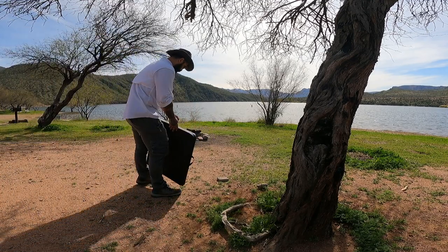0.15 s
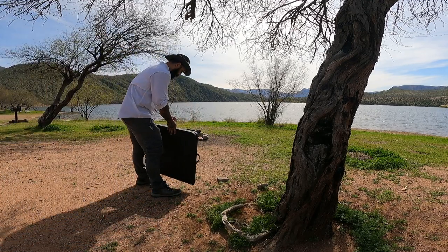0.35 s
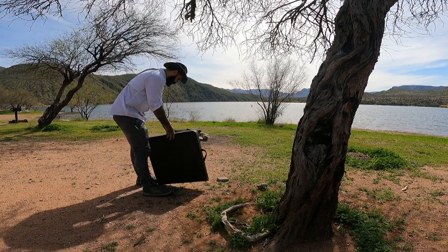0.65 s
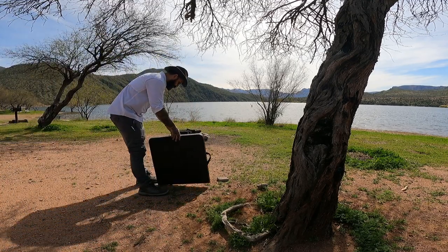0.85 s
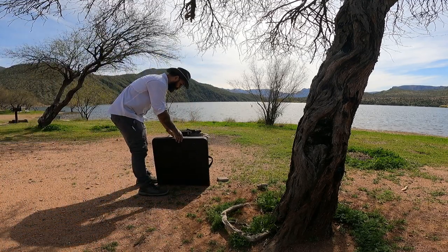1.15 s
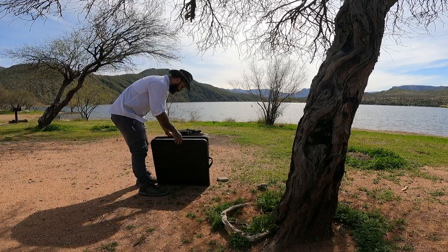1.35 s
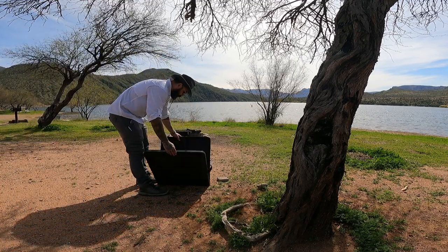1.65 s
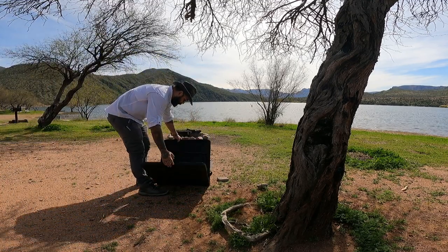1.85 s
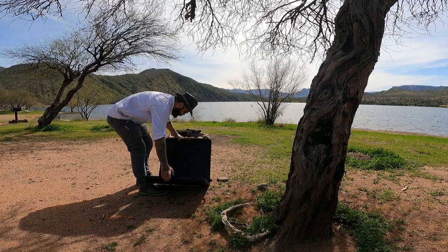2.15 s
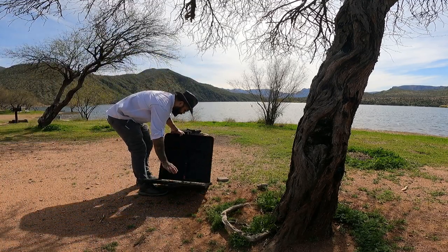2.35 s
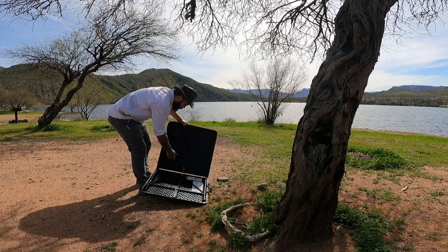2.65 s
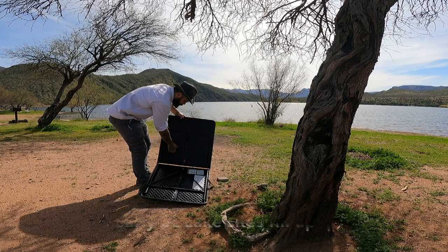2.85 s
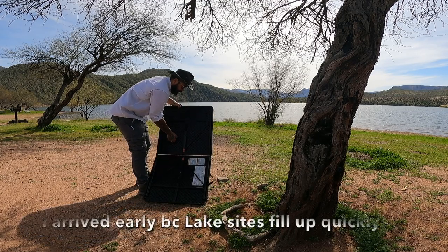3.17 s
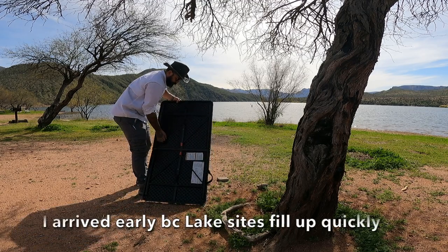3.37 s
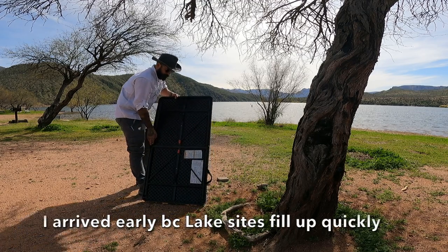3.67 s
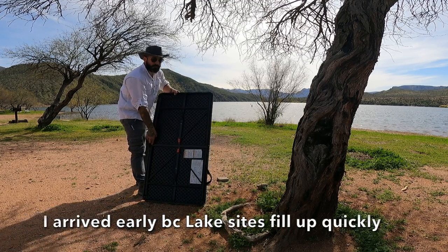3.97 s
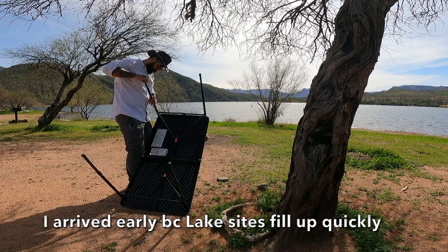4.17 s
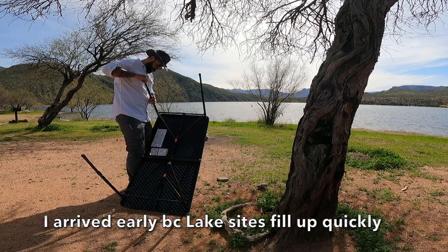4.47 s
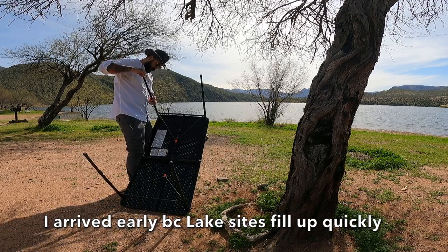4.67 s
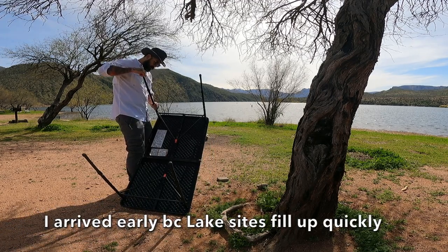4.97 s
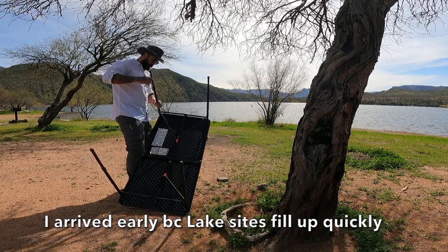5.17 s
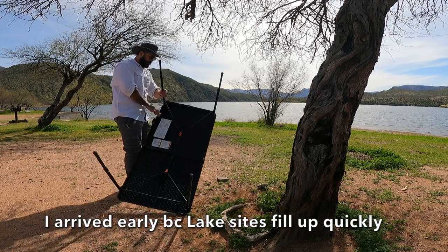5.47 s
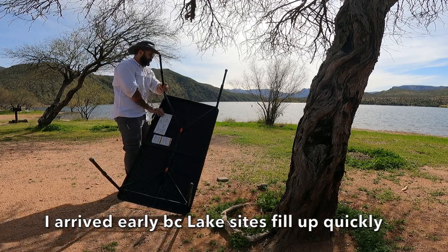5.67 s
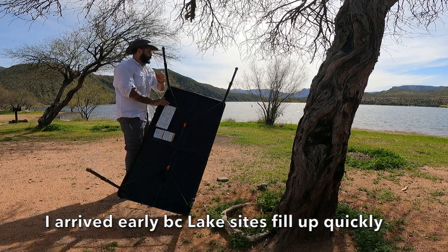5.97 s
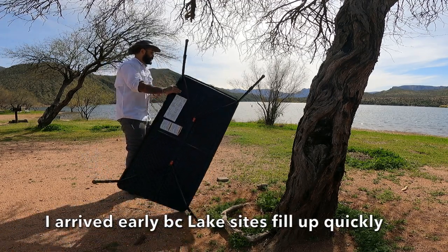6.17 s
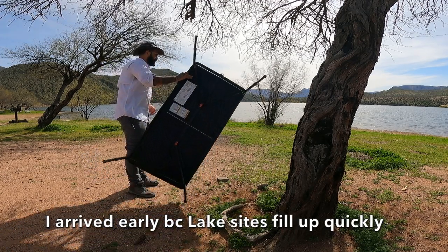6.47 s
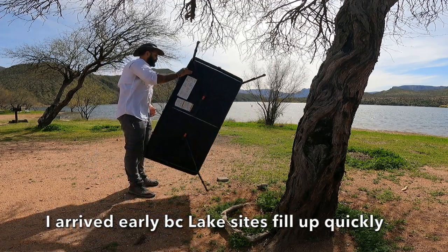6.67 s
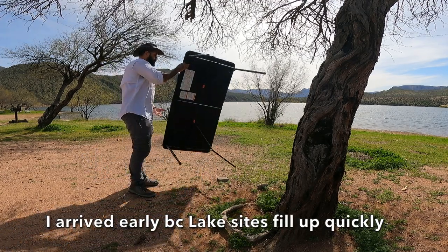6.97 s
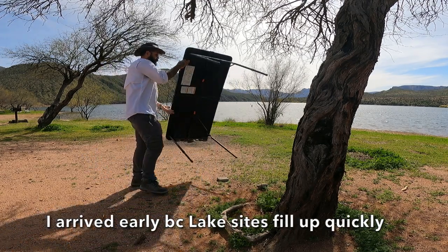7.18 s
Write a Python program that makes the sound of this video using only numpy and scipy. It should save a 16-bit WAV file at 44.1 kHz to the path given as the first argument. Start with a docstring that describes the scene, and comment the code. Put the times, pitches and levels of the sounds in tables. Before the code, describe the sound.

Outdoors by a lake, a hollow folding table bumps onto gravel in quick thuds, pauses, then falls open with a loud rattling bang. A hinge groans briefly as it is pressed flat, small clicks follow, and a metal leg clacks into its lock. A distant engine pulls low, then runs lightly. Faint birds whistle. Fairly close microphone, dry open space, almost mono.

```python
"""Camp table opened by a lake

A folding table is set down on gravel, opened like a suitcase, and its metal legs are swung out.
Blows ring the hollow top as fading sine waves and crack as noise; the frame, leg tubes and catches clink.
Bursts of tiny slips make the scrapes, and a juddering hinge groans. Some way off an engine, built from
wavering tones, noise and pops, pulls, falls back and runs on lightly. Small birds whistle faintly
over thin whines and a wash of open air.
"""
import sys
import numpy as np
from scipy import signal
from scipy.fft import rfft, irfft
from scipy.io import wavfile
from scipy.ndimage import uniform_filter1d

SR = 44100
rng = np.random.default_rng(int(sys.argv[2]) if len(sys.argv) > 2 else 0)


def output_pcm(signal):
    """Save a mono or channel-first signal as 16-bit PCM at the path in sys.argv[1].

    Samples are clipped to [-1, 1] before scaling.
    """
    pcm = np.clip(np.atleast_2d(signal).T, -1, 1) * 32767
    wavfile.write(sys.argv[1], SR, np.round(pcm).astype(np.int16))


N = 323253
T = np.arange(N) / SR
RING_T = T[:SR // 2]  # half a second, room for one ringing sound


def amp(db):
    """Turns decibels into a gain."""
    return 10 ** (np.asarray(db) / 20)


def unit(x):
    """Scales a signal to an rms of one."""
    return x / np.sqrt(np.mean(x ** 2) + 1e-20)


def curves(rows):
    """Draws straight lines between the rows of a time table, giving each column at every sample."""
    s, *columns = np.transpose(rows)
    return [np.interp(T, s, column) for column in columns]


def spectrum_db(points, hz):
    """Reads a spectrum on a log-frequency axis."""
    point_hz, db = np.transpose(points)
    return np.interp(np.log(hz + 1), np.log(point_hz + 1), db)


def colour(x, points):
    """Multiplies a signal's spectrum by a given shape, then scales it to an rms of one."""
    hz = np.fft.rfftfreq(len(x), 1 / SR)
    return unit(irfft(rfft(x) * amp(spectrum_db(points, hz)), len(x)))


def add(mix, s, sound):
    """Mixes a sound in at a time in seconds, cutting it off at the end of the scene."""
    part = mix[max(round(s * SR), 0):][:len(sound)]
    part += sound[:len(part)]


def fade(t, t60):
    """Exponential decay that drops by 60 dB in t60 seconds."""
    return np.exp(-np.log(1000) * t / np.maximum(t60, 1e-3))


def drift(per_s):
    """Random wander of unit size, holding only frequencies below per_s cycles per second."""
    slow = np.fft.rfftfreq(N, 1 / SR) < per_s
    return unit(irfft(rfft(rng.standard_normal(N)) * slow, N))


def burst(points, t60, ring_db, ring_t60, uneven_db, rise_s, modes_hz, chatter_db=3):
    """Many close modes, some woken more than others: a quick, chattering flash and a weaker after-ring."""
    hz = np.arange(0, SR / 2, modes_hz)
    uneven = uneven_db * rng.standard_normal(len(hz)).clip(-2, 2)
    woken = np.transpose([hz, spectrum_db(points, hz) + uneven])
    wobble = unit(uniform_filter1d(rng.standard_normal(len(RING_T)), size=80))
    chatter = unit(amp(chatter_db * wobble.clip(-2, 2)))
    noise = colour(chatter * rng.standard_normal(len(RING_T)), woken)
    envelope = fade(RING_T, t60) + amp(ring_db) * fade(RING_T, ring_t60)
    return noise * envelope * (1 - fade(RING_T, rise_s))


# Blows on the table top: it is carried, set down on the gravel, rocks onto its edge and comes to rest (to 1.3 s),
# falls open and bounces (2.7 s), is pressed flat (3.4 s) and stood upright (4 s);
# a leg swings out and locks (5.4 s), and the table is lifted (6.4 s):
# (time [s], boom level before its trim [dB], boom centre [Hz], crack level [dB], crack centre [Hz])
BLOWS = [(0.165, -41.5, 404, -62, 700), (0.469, -56, 430, -61, 700), (.515, -38, 390, -69, 700),
         (0.729, -47, 507, -34, 1700), (0.741, -29.5, 500, -34, 1290), (.755, -27, 209, -24, 696),
         (0.7727, -27.5, 308, -23.5, 1390), (.788, -31, 415, -31, 1480), (.796, -35, 226, -27.5, 910),
         (.811, -49, 446, -30, 1490), (1.060, -33, 600, -37, 2200), (1.069, -21.5, 536, -33, 1590),
         (1.0765, -35, 340, -21, 2620), (1.081, -30.5, 305, -23.5, 2660), (1.088, -22, 224, -39, 1990),
         (1.102, -28.5, 281.3, -46, 1800), (1.205, -39, 400, -61, 820), (2.175, -48, 192.3, -87, 590),
         (2.722, -22.5, 594, -19.5, 2980), (2.7294, -18, 440, -22.5, 1500), (2.7335, -15, 370, -19, 1800),
         (2.738, -16.5, 229.5, -26, 896), (2.764, -40, 450, -40, 750), (2.789, -36.5, 563, -35, 795),
         (2.817, -31, 200, -44, 690), (2.859, -20, 220, -32.5, 497), (2.870, -23.5, 300, -32, 690),
         (3.383, -28.5, 383, -49, 1300), (3.400, -27.5, 200, -58, 513), (3.483, -28, 334, -32, 900),
         (3.503, -32.5, 260, -36.5, 700), (3.970, -67, 500, -31, 1380), (4.057, -45, 227, -47, 800),
         (4.510, -68, 405, -41, 1080), (5.398, -46, 400, -44.5, 1400), (5.419, -44, 66, -55, 800),
         (5.473, -35.5, 170, -53, 808), (5.502, -37, 800, -48, 900), (5.535, -36, 700, -34, 1200),
         (5.548, -29, 130, -42, 900), (5.559, -36.5, 300, -23.5, 3200), (5.572, -32, 361, -21.5, 3060),
         (5.577, -53, 600, -44, 1600), (5.585, -26, 256, -51, 1200), (5.603, -30, 113, -63, 800),
         (6.367, -48, 333, -43, 790), (6.684, -55.5, 506, -45.5, 1322), (6.866, -74.5, 503.6, -45.5, 1597),
         (7.025, -47.5, 280, -58, 697.6), (7.281, -55.5, 647, -47.5, 850)]
# Modes of the hollow top: (frequency [Hz], relative level [dB], t60 [s])
TOP_MODES = [(69.3, -13, 0.5), (108.7, -5, 0.15), (131, -2.5, 0.26), (176.7, -4, 0.18), (201.4, 2.5, 0.11),
             (261.2, -4, 0.12), (309, 4.5, 0.09), (354.5, -8, 0.14), (390.3, 3.5, 0.066), (460, 1.5, 0.09),
             (517, -7.5, 0.13), (588.4, 2.5, 0.085), (693, -2.5, 0.066), (766.4, -1, 0.14),
             (940, -6.5, 0.08), (985, -10, 0.047)]
# Shape of the dense upper modes of the top: (frequency [Hz], relative level per Hz [dB])
CRACK_SHAPE = [(250, -10.5), (700, 18), (1100, 7.5), (1750, -1), (2400, 0), (3300, -6), (4800, -23.5),
               (6000, -17), (8000, -19), (10000, -42.5), (14000, -40.5)]
GRIP = 0.013  # grip and support shift each mode by about this share from blow to blow
PLACE_DB = 4.5  # the place struck wakes each mode more or less by about this much


def table_top(boom_db=3, below_octaves=0.65, above_octaves=0.45, give_s=0.012, crack_fall_db=3, edge_hz=75):
    """Each blow wakes the hollow top's modes near its own centre, unevenly by the place struck, and adds a crack."""
    out = np.zeros(N)
    hz, db, t60 = np.transpose(TOP_MODES)[:, :, None]
    crack_hz, crack_shape = np.transpose(CRACK_SHAPE)
    bass_cut = signal.butter(2, edge_hz, "high", fs=SR)
    for s, level, centre, crack, crack_centre in BLOWS:
        octaves = np.log2(hz / centre)
        width = np.where(octaves < 0, below_octaves, above_octaves)
        grip = 1 + GRIP * rng.standard_normal(hz.shape)
        share = amp(db + PLACE_DB * rng.standard_normal(hz.shape)) / (1 + (octaves / width) ** 4)
        modes = share * np.sin(2 * np.pi * hz * grip * RING_T) * fade(RING_T, t60)
        boom = modes.sum(0) * (1 - fade(RING_T, give_s))
        # deep bass slips around the panel's edges
        boom = signal.lfilter(*bass_cut, boom)
        add(out, s, amp(level + boom_db) * boom / abs(boom).max())
        # a harder contact cracks higher
        shape = np.transpose([crack_hz, crack_shape - crack_fall_db * np.log2(crack_hz / crack_centre) ** 2])
        flash = burst(shape, t60=0.016, ring_db=-17, ring_t60=0.13, uneven_db=2.5, rise_s=0.012, modes_hz=81.8)
        add(out, s, amp(crack) * flash)
    return out


# Modes of the metal frame: (frequency [Hz], relative level [dB])
FRAME_MODES = [(1338, -8.5), (1556, -9.5), (1645, -12.5), (1779, -5.5), (2535, -15), (2668, -9),
               (2908, -10), (4902, -20.5)]


def frame(ring_db=-9, t60=0.047):
    """Each crack sets the metal frame around the top ringing, most of all near the crack's centre."""
    out = np.zeros(N)
    hz, db = np.transpose(FRAME_MODES)[:, :, None]
    for s, _, _, crack, centre in BLOWS:
        share = amp(db + PLACE_DB * rng.standard_normal(hz.shape)) / (1 + np.log2(hz / centre) ** 2)
        ring = (share * np.sin(2 * np.pi * (hz * RING_T + rng.random(hz.shape)))).sum(0)
        add(out, s, amp(crack + ring_db) * ring * fade(RING_T, t60) * (1 - fade(RING_T, .005)))
    return out


# Metal on metal: (time [s], leg tube level before its trim [dB], centre of the tube's ring [Hz],
# spring catch level [dB], t60 of the first flash [s])
METAL_HITS = [(0.737, -49.5, 7000, -75, 0.069), (1.069, -43, 6500, -66, 0.034),
              (2.555, -53.5, 5800, -69, 0.036), (2.7198, -21, 3520, -48, 0.016),
              (2.735, -21, 3640, -53, 0.022), (2.760, -24, 4400, -40, 0.014),
              (2.857, -62, 4300, -35.5, 0.0081), (2.865, -43.5, 3700, -83, 0.053),
              (2.884, -49, 4620, -57.5, 0.052), (3.244, -82, 4360, -62.5, 0.15),
              (3.371, -31, 4640, -51, 0.015), (3.375, -27, 4860, -56, 0.014),
              (3.379, -21, 4400, -56, 0.013), (3.386, -32.5, 3900, -48, 0.024),
              (3.4815, -26.5, 3820, -63, 0.0099), (3.631, -39.5, 4760, -47, 0.034),
              (3.646, -51, 4240, -63, 0.21), (3.78, -82, 4300, -48, 0.012), (3.845, -59, 4300, -68, 0.038),
              (3.886, -70, 5500, -68, 0.042), (3.969, -61, 4800, -60.5, 0.14),
              (4.198, -71, 4300, -61, 0.03), (4.254, -51, 4335, -36, .012), (4.465, -71, 4800, -59.5, 0.19),
              (4.502, -55, 4300, -60.5, 0.098), (5.383, -35.5, 5500, -41.5, 0.022),
              (5.399, -25, 5900, -36, 0.02), (5.428, -39, 6530, -42, 0.033),
              (5.441, -33.5, 4700, -45, 0.035), (5.499, -29.5, 3700, -41.5, 0.024),
              (5.531, -39, 4300, -55, 0.026), (5.558, -20.5, 3200, -16, 0.013),
              (5.568, -29.5, 5000, -43, 0.041), (5.743, -56, 4300, -54.5, 0.036),
              (7.319, -46.5, 7100, -59, 0.048)]
# Shape of a leg tube's ring: (frequency [Hz], relative level per Hz [dB])
TUBE_SHAPE = [(1200, 1), (2200, -16.5), (2800, 4.5), (3200, 4.5), (3700, 6.5), (4300, 7), (4800, 3),
              (5300, 3), (5800, -2.5), (6800, -3.5), (9500, -21.5), (12000, -30.5), (14000, -30.5)]
# Shape of a catch's ring: (multiple of its pitch, relative level per Hz [dB])
CATCH_SHAPE = [(.68, -25), (.86, -18.5), (.94, 0.5), (1.0, 0), (1.06, -11), (1.13, -22.5), (1.36, -38.5),
               (1.45, -29), (1.54, -32.5), (1.7, -40)]
CATCH_HZ, CATCH_SPREAD = 8360, 0.07  # basic pitch of the catches, and the share that scales its random shifts


def legs(tube_db=-1.0, tube_fall_db=8):
    """Leg tubes hit their stops, each contact with its own brightness, and the small spring catches ring."""
    out = np.zeros(N)
    tube_hz, tube_shape = np.transpose(TUBE_SHAPE)
    for s, tube, centre, catch, t60 in METAL_HITS:
        shape = np.transpose([tube_hz, tube_shape - tube_fall_db * np.log2(tube_hz / centre) ** 2])
        tube_ring = burst(shape, t60, ring_db=-23.0, ring_t60=0.15, uneven_db=4.0, rise_s=0.029, modes_hz=126.5)
        add(out, s, amp(tube + tube_db) * tube_ring)
        pitch = CATCH_HZ * (1 + CATCH_SPREAD * rng.uniform(-1.6, 1))
        shape = np.multiply(CATCH_SHAPE, [pitch, 1])
        catch_ring = burst(shape, t60, ring_db=-31.5, ring_t60=0.14, uneven_db=5, rise_s=.017, modes_hz=126.6)
        add(out, s, amp(catch) * catch_ring)
    return out


# Scuffs on gravel and sliding joints; at 5.18 s a leg slides in its joint:
# (time of the height [s], half length [s], level [dB], centre [Hz], width [octaves])
SCUFFS = [(0.683, 0.014, -49, 1940, 0.22), (0.687, 0.036, -47, 597, 0.76), (.742, 0.0044, -42, 3650, 0.12),
          (0.75, 0.023, -54, 3680, 0.17), (.797, 0.03, -47, 1360, 1.09), (1.123, 0.031, -51, 2020, 0.14),
          (1.871, 0.038, -72, 2980, 1.2), (2.546, 0.036, -70.5, 3850, 0.58),
          (3.26, 0.0045, -54.5, 2080, 0.61), (3.659, 0.015, -43, 2060, 1.47),
          (3.696, 0.032, -55, 2140, 0.75), (3.987, 0.02, -49, 1170, 0.85),
          (4.523, 0.014, -51.5, 1000, 0.39), (5.179, 0.14, -77.5, 5950, 0.63),
          (5.453, 0.058, -60.5, 1810, 1.3), (5.537, 0.036, -48, 2400, 3.1),
          (5.599, 0.051, -64.5, 2230, 0.36), (5.746, 0.02, -60.5, 498, 1.6),
          (6.711, 0.018, -61, 1272, 0.42), (6.955, 0.036, -67, 2359, 0.59), (7.289, 0.02, -53.5, 791, .32)]
SLIPS_PER_S, FIRM_DB = 2000, -57  # rate of slips in a firm scuff, and its level
SLIP_GROWTH = 0.28  # how fast the slips thin out in lighter scuffs [dB of rate per dB of level]


def scrapes(grain_db=0.5, skirt_db=-45, top_hz=8500):
    """A swell of tiny random slips, coloured by what is rubbed."""
    out = np.zeros(N)
    t = T[:SR] - 1 / 2  # one second, with the height in the middle
    hz = np.fft.rfftfreq(SR, 1 / SR)
    for s, length, db, centre, octaves in SCUFFS:
        per_s = SLIPS_PER_S * amp(SLIP_GROWTH * (db - FIRM_DB))
        sizes = amp(grain_db * np.minimum(rng.exponential(1, SR), 4))
        slips = rng.choice([-1, 1], SR) * sizes * (rng.random(SR) < per_s / SR)
        band = np.exp(-(np.log2((hz + 1) / centre) / octaves) ** 2 / 2)
        band += amp(skirt_db) / (1 + hz / centre)
        rubbed = irfft(rfft(slips) * band / (1 + (hz / top_hz) ** 8), SR)
        add(out, s - 1 / 2, amp(db) * unit(rubbed) / np.cosh(t / length) ** 2)
    return out


# The hinge judders as the halves are pressed flat, slowing and growing harsher:
# (time [s], slips per second, level [dB], step from one overtone to the next [dB])
HINGE_JUDDER = [(3.278, 195, -50, -16), (3.299, 157, -31.5, -16), (3.325, 172, -29.5, -20.5),
                (3.353, 164, -33, -20), (3.371, 144, -37, 0.5), (3.391, 139, -31.5, 4),
                (3.412, 140, -70, -4)]


def hinge(rough=0.25, slip=0.35):
    """Uneven stick and slip in the hinge shakes the top into a short, deep groan."""
    hz, db, overtone_db = curves(HINGE_JUDDER)
    turn = 2 * np.pi * np.cumsum(hz) / SR + slip * drift(76)
    shares = amp(overtone_db * np.arange(3)[:, None])
    tones = shares * np.sin(np.arange(1, 4)[:, None] * turn)
    shake = np.sqrt(2) * tones.sum(0) / np.linalg.norm(shares, axis=0)
    juddering = (T > HINGE_JUDDER[0][0]) * (T < HINGE_JUDDER[-1][0])
    return amp(db) * shake * (1 + rough * drift(78)) * juddering


# The engine pulls, falls back and runs on lightly:
# (time [s], speed [turns per second], exhaust level [dB], load [0-1])
ENGINE_COURSE = [(0, 33, -47.5, 0.97), (.73, 32.6, -48, 1), (1.0, 33.7, -54, 1), (1.25, 36.2, -50, 0.93),
                 (1.55, 37.8, -57.5, 0.73), (1.8, 35.8, -64, 0.1), (2.4, 29, -71, 0), (3.2, 30, -71, 0),
                 (3.7, 37, -61.5, 0.22), (4.04, 37.6, -61, 0), (4.28, 35.3, -64, 0.08),
                 (4.46, 39.5, -55, 0), (4.77, 37.7, -59, 0), (5.15, 39, -63, 0.01), (5.75, 38, -57, 0.08),
                 (6.4, 35.6, -65.5, 0), (7.0, 36.3, -60.5, 0), (7.33, 36, -62, 0)]
# Tones of the exhaust: (multiple of the engine speed, relative level under load [dB], running light [dB])
EXHAUST_TONES = [(1, -41, -16), (1.5, -8.5, -36.5), (2, -29.5, -16), (3, -1.5, -0.5), (4, -20.5, -14),
                 (4.5, -8.5, -32), (5, -20, 0.5), (6, -6, -18.5), (7, -25.5, -8.5), (9, -15, -25),
                 (12, -12.5, -20.5)]
# Shape of the exhaust pipe's rumble: (frequency [Hz], relative level [dB])
PIPE_SHAPE = [(22, -44.5), (38, -10.5), (50, -8), (74, -12), (98, -1.5), (112, 2), (148, -9.5), (190, -0.5),
              (228, -18.5), (265, -4.5), (320, -14), (390, -12), (460, -16.5), (600, -30), (900, -47),
              (1500, -56.5), (6000, -90.5)]
# Sharper pops of the exhaust: (time [s], peak level [dB])
EXHAUST_POPS = [(0.14, -34.5), (0.189, -33.5), (0.384, -39), (0.500, -32.5), (4.443, -37.5), (4.599, -39),
                (4.968, -43.5)]
FIRINGS_PER_TURN = 3


def engine(waver_db=1.0, wander=0.081, rough_db=-4, pop_s=0.0022):
    """Wavering exhaust tones that change with load, the rumble of uneven firings in the pipe, and an odd sharp pop."""
    speed, level, load = curves(ENGINE_COURSE)
    turns = np.cumsum(speed) / SR
    tones = np.zeros(N)
    for multiple, loaded, light in EXHAUST_TONES:
        tone_db = light + load * (loaded - light) + waver_db * drift(5.9)
        cycles = multiple * turns + rng.random() + wander * drift(4.6)
        tones += amp(tone_db) * np.sqrt(2) * np.sin(2 * np.pi * cycles)
    # one click of random size and sign at each firing
    firings = np.diff(np.floor(FIRINGS_PER_TURN * turns), prepend=0) * rng.standard_normal(N)
    out = amp(level) * (tones + amp(rough_db) * colour(firings, PIPE_SHAPE))
    for s, db in EXHAUST_POPS:
        u = (T - s) / pop_s
        out += amp(db) * (1 - u ** 2) * np.exp(-u ** 2 / 2)
    return out


# Course of the engine's hiss, before it wavers: (time [s], level [dB])
HISS_COURSE = [(0, -67.5), (.55, -64.5), (.85, -57.5), (1.3, -59.5), (1.55, -70), (3.1, -68.5), (3.8, -63),
               (4.5, -64.5), (5.2, -71), (5.8, -66), (6.1, -72), (7.33, -69.5)]
# Shape of the low roar: (frequency [Hz], relative level per Hz [dB])
ROAR_SHAPE = [(30, -15.5), (110, 3), (250, 0), (400, 2), (560, -6), (800, -12.5), (1500, -60.5),
              (4000, -74)]
# Shape of the hiss: (frequency [Hz], relative level per Hz [dB])
HISS_SHAPE = [(300, 3.5), (800, 5.5), (1300, 3.5), (2400, 0.5), (4300, -8.5), (5500, -18.5), (7500, -26),
              (10000, -47)]
LOADED_DB = -46.5  # level of the exhaust under load
ROAR_DB, ROAR_GROWTH = 10.5, 0.48  # the roar above the hiss under load [dB], and its dB per dB of exhaust


def rush(throb_db=2.0, waver_db=0.7):
    """The engine's hiss, and a throbbing roar that gains on it with effort, both made of coloured noise."""
    hiss_db, = curves(HISS_COURSE)
    _, exhaust_db, _ = curves(ENGINE_COURSE)
    roar_db = hiss_db + ROAR_DB + ROAR_GROWTH * (exhaust_db - LOADED_DB)
    roar = amp(roar_db + throb_db * drift(20)) * colour(rng.standard_normal(N), ROAR_SHAPE)
    hiss = amp(hiss_db + waver_db * drift(15)) * colour(rng.standard_normal(N), HISS_SHAPE)
    return roar + hiss


# Bird calls: (time [s], length [s], start [Hz], middle [Hz], end [Hz], level before the flutter [dB])
BIRD_CALLS = [(2.301, 0.024, 5700, 5640, 5380, -72), (4.313, 0.047, 7700, 7570, 7200, -72),
              (6.125, 0.063, 5700, 5415, 5206, -81), (6.256, 0.037, 3980, 3850, 3620, -65.5),
              (6.55, 0.082, 5250, 5070, 4996, -76), (6.579, 0.071, 4450, 4940, 4630, -72.5),
              (6.735, 0.071, 3650, 4040, 4100, -70.5), (7.151, 0.041, 3240, 3790, 4350, -73.5)]


def birds(waver=0.014, flutter_db=3):
    """Thin, distant whistles that glide between three pitches and flutter, blurred by the trees."""
    out = np.zeros(N)
    wobble = drift(200)
    flutter = amp(flutter_db * drift(70))
    for s, length, *pitches, db in BIRD_CALLS:
        u = np.linspace(0, 1, int(length * SR))
        hz = np.interp(u, [0, 1 / 2, 1], pitches) * (1 + waver * wobble[int(s * SR):][:len(u)])
        add(out, s, amp(db) * np.sin(np.pi * u) * np.sin(2 * np.pi * np.cumsum(hz) / SR))
    return out * flutter + scatter(out, wet_db=-5, t60=0.2)


# Narrow, distant whines in the background: (frequency [Hz], level [dB])
FAR_WHINES = [(1160, -81), (2150, -83)]


def whines(width_hz=35):
    """Thin bands of steady noise from far off: slow wander carried on a sine and a cosine."""
    out = np.zeros(N)
    for hz, db in FAR_WHINES:
        angle = 2 * np.pi * hz * T
        out += amp(db) * unit(drift(width_hz) * np.sin(angle) + drift(width_hz) * np.cos(angle))
    return out


# Shape of the open air: (frequency [Hz], relative level per Hz [dB])
AIR_SHAPE = [(25, -20.5), (60, -8), (110, 0), (240, 5), (400, -5.5), (650, -8), (900, -22.5), (1170, -19),
             (1450, -31), (1950, -17.5), (2150, -24), (2400, -27.5), (4000, -23.5), (5500, -36),
             (8000, -44), (14000, -60.5)]


def air(level_db=-63.5):
    """Faint, even wash of the lakeside, made of coloured noise."""
    return amp(level_db) * colour(rng.standard_normal(N), AIR_SHAPE)


def scatter(x, wet_db=-20, t60=0.39, dull_hz=5200):
    """Ground and trees throw back a thin, short, duller tail."""
    tail = rng.standard_normal(len(RING_T)) * fade(RING_T, t60) * (1 - fade(RING_T, 0.019))
    tail = signal.lfilter(*signal.butter(2, dull_hz, fs=SR), tail / np.linalg.norm(tail))
    return amp(wet_db) * signal.fftconvolve(x, tail)[:N]


def scene():
    """Everything sits straight ahead, with a trace of width from the surroundings."""
    table = table_top() + frame() + legs() + scrapes() + hinge()
    mid = table + scatter(table) + engine() + rush() + birds() + whines() + air()
    side = scatter(table, wet_db=-52.5, t60=0.0707) + amp(-45.0) * air()
    return np.array([mid + side, mid - side])


def record(dry, edge_hz=14100):
    """A steep low-pass filter takes away the treble above its edge."""
    low_pass = signal.firwin(511, edge_hz, window=("kaiser", 9), fs=SR)
    return signal.oaconvolve(dry, low_pass[None], "same")


dry = scene()
out = record(dry)
output_pcm(out)
```